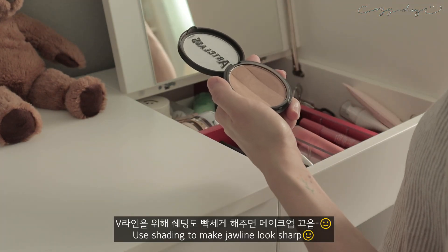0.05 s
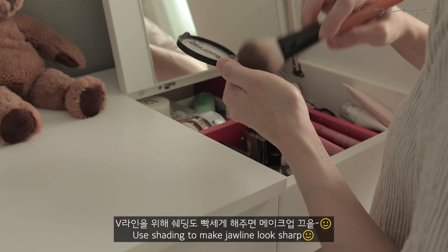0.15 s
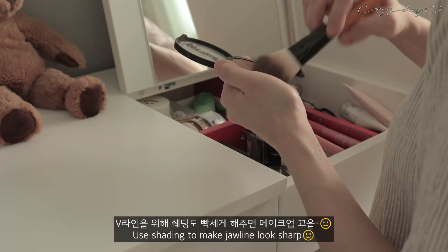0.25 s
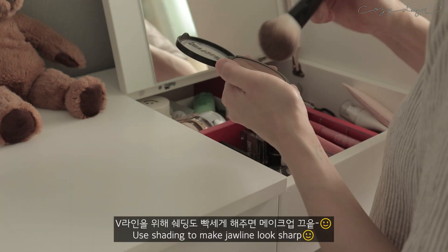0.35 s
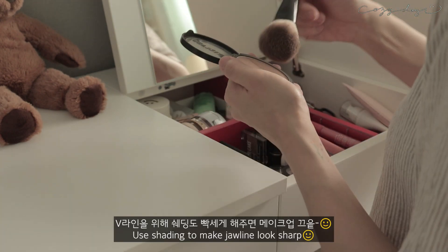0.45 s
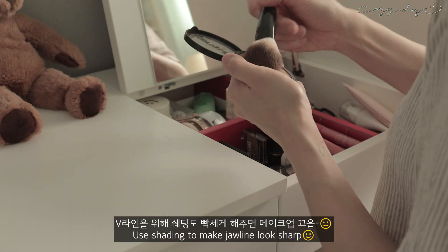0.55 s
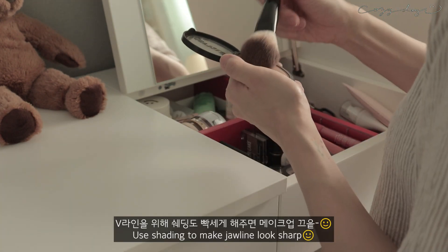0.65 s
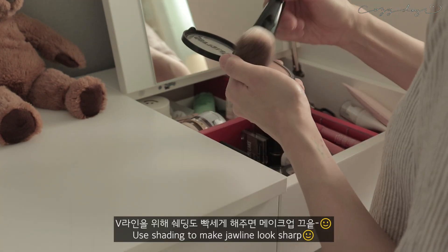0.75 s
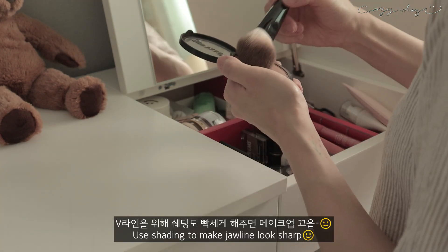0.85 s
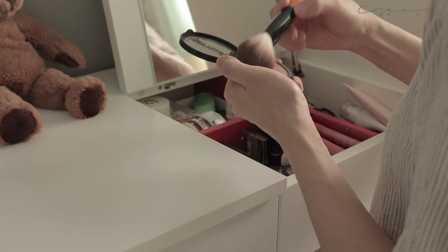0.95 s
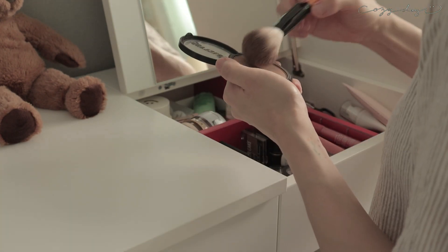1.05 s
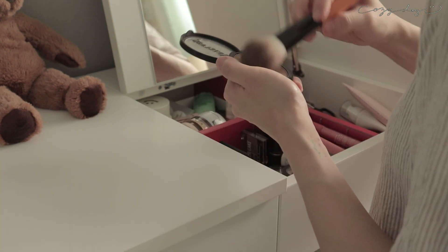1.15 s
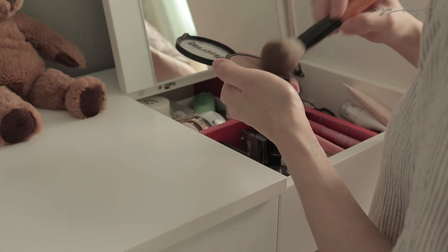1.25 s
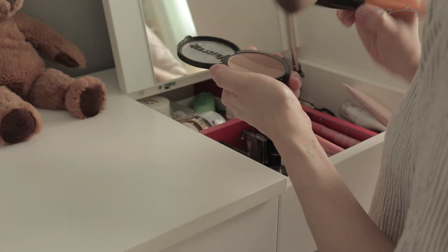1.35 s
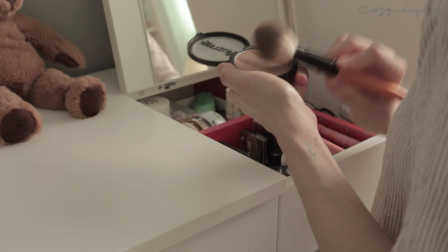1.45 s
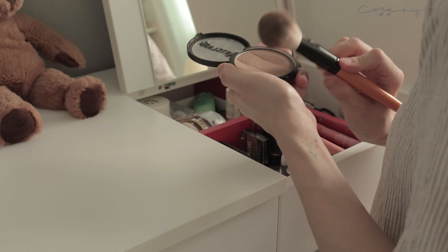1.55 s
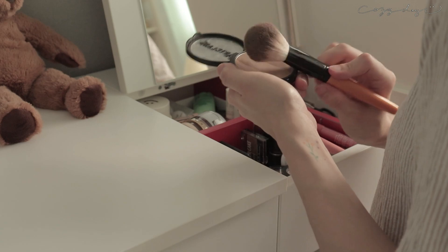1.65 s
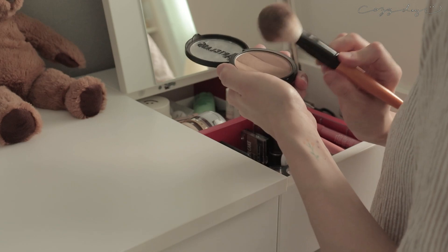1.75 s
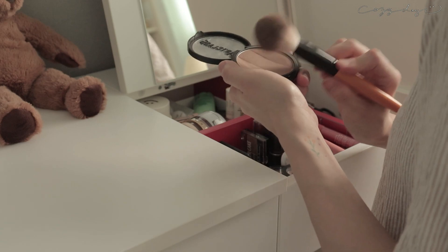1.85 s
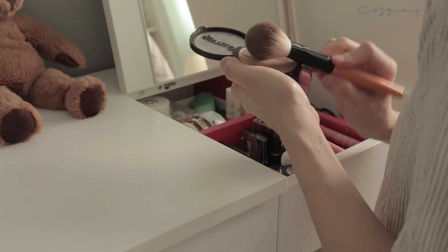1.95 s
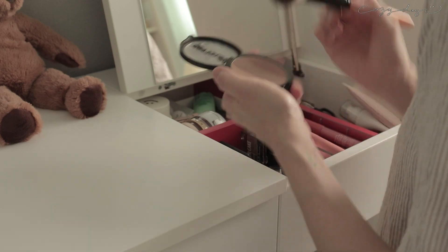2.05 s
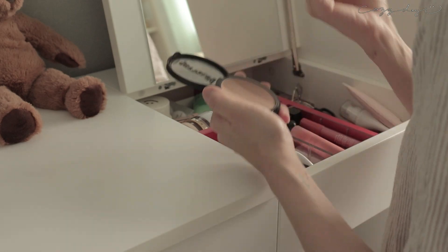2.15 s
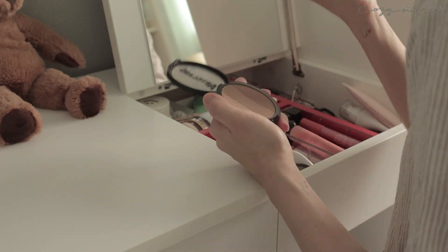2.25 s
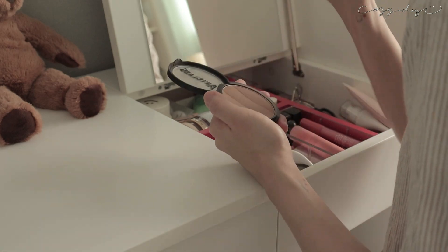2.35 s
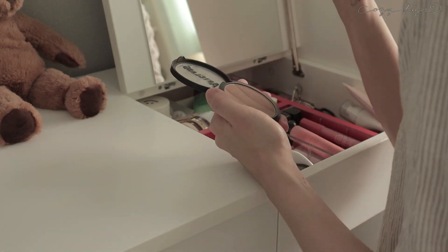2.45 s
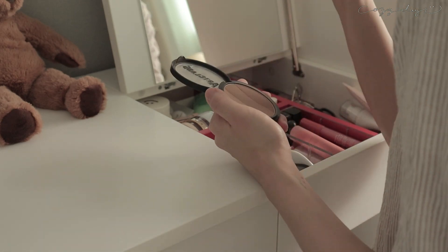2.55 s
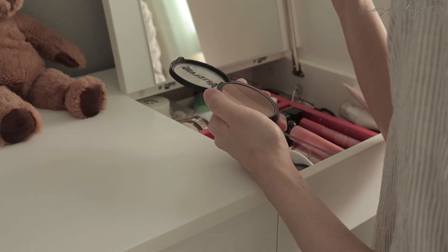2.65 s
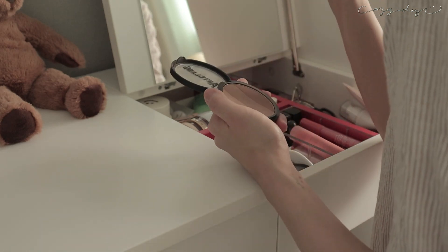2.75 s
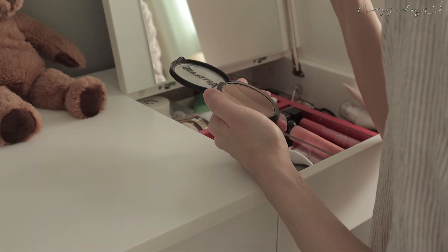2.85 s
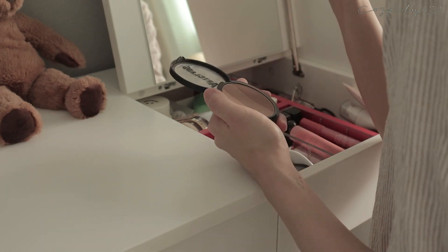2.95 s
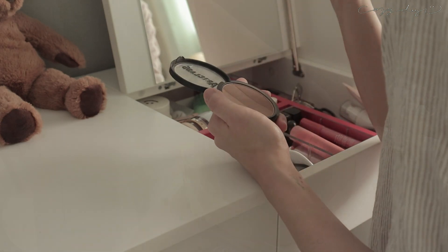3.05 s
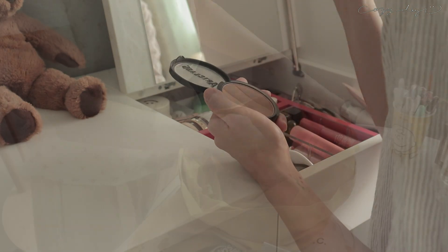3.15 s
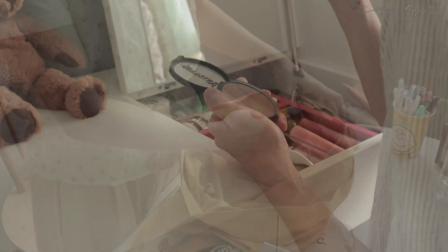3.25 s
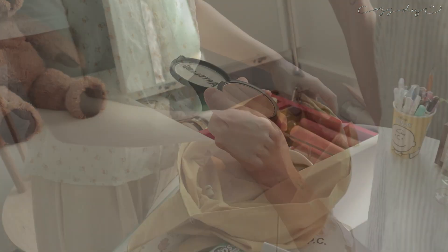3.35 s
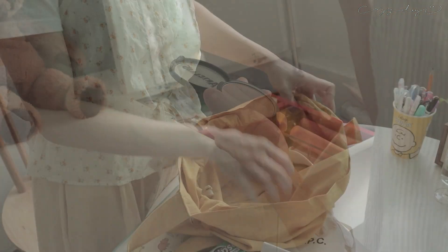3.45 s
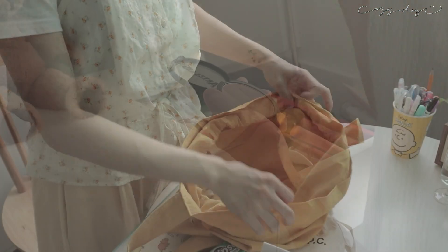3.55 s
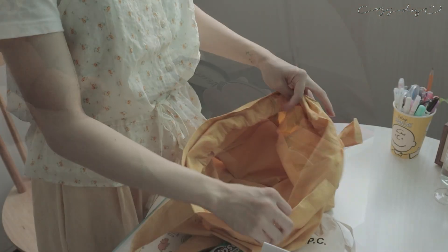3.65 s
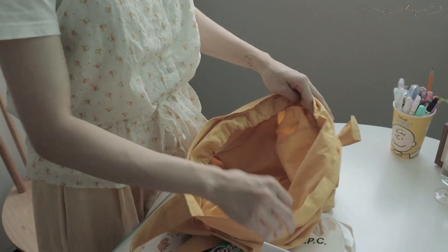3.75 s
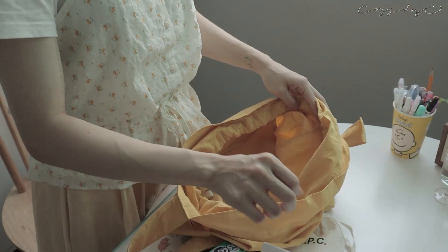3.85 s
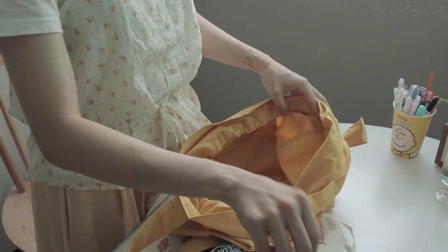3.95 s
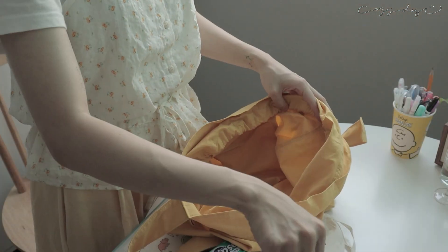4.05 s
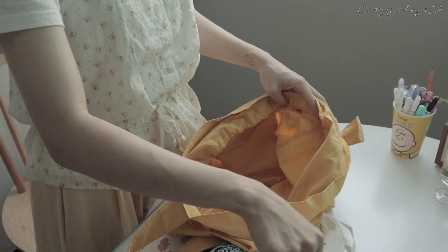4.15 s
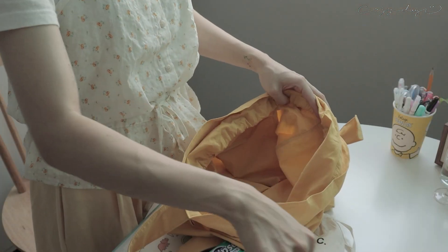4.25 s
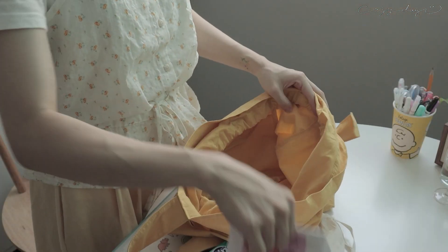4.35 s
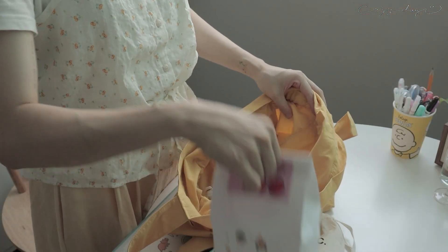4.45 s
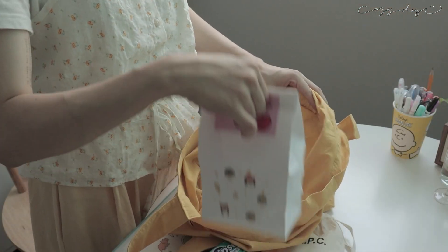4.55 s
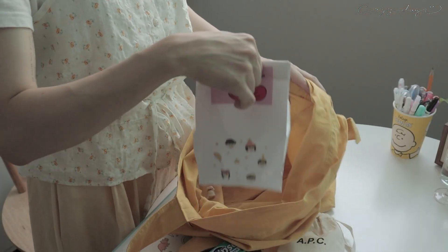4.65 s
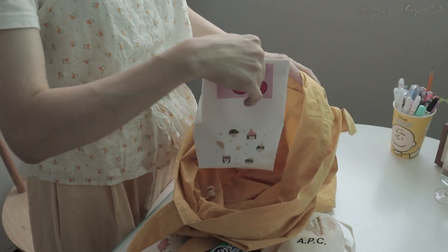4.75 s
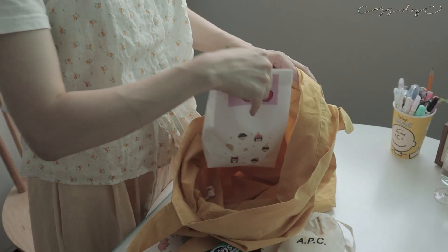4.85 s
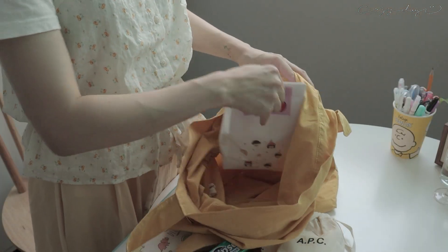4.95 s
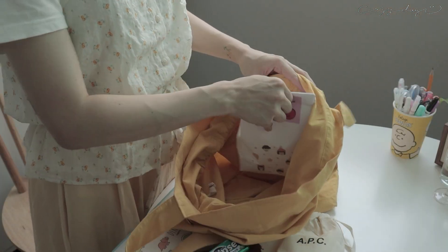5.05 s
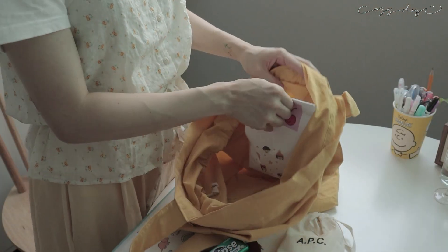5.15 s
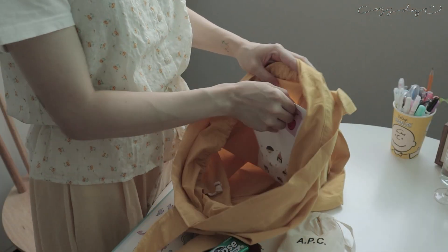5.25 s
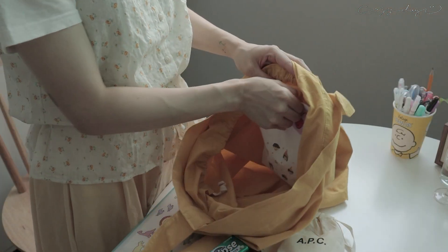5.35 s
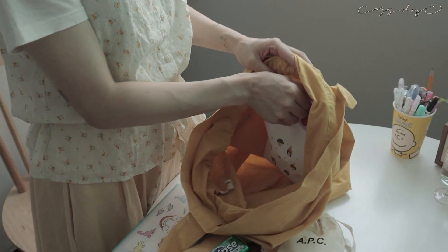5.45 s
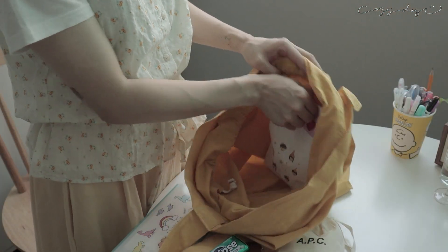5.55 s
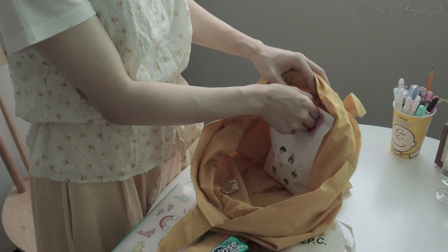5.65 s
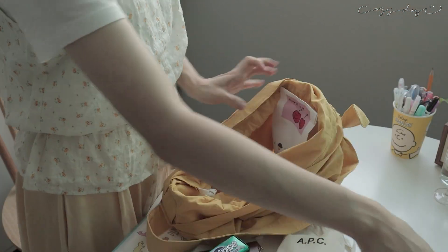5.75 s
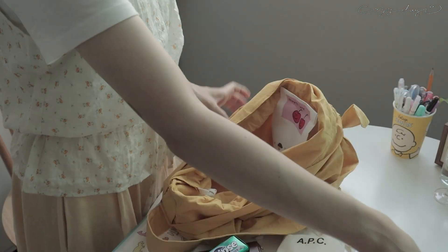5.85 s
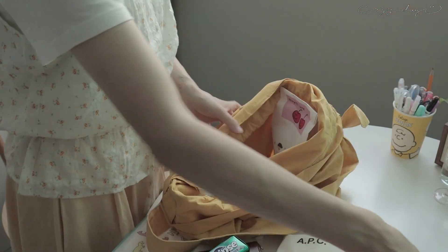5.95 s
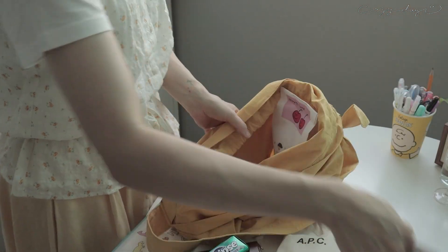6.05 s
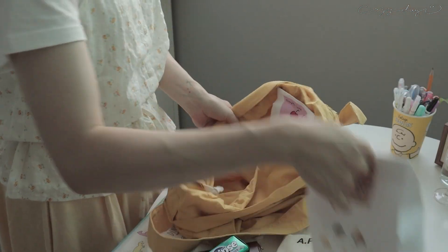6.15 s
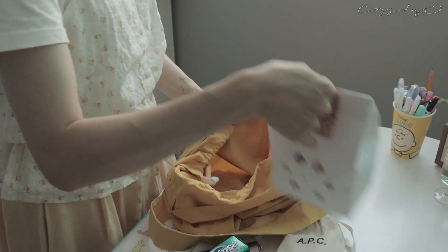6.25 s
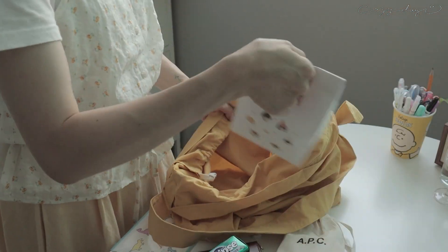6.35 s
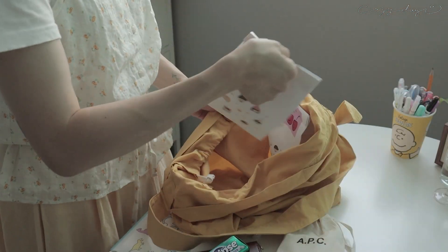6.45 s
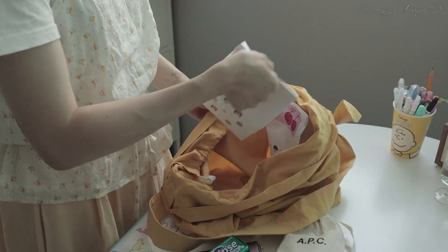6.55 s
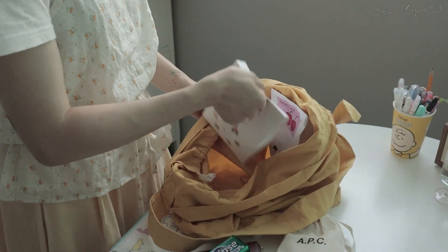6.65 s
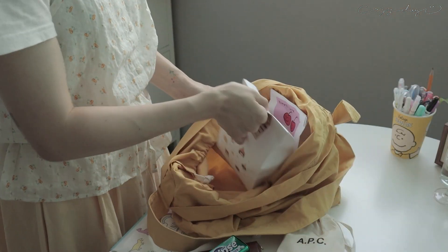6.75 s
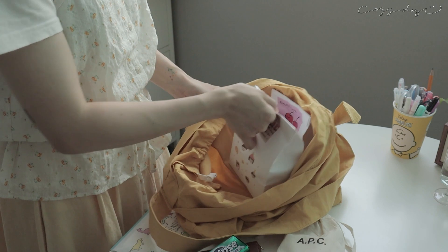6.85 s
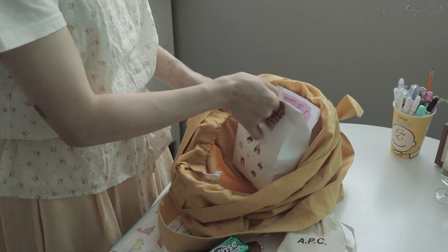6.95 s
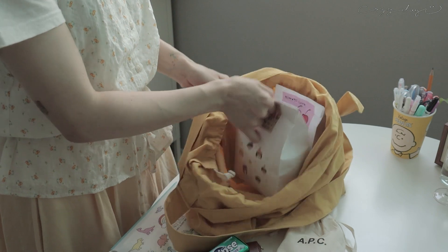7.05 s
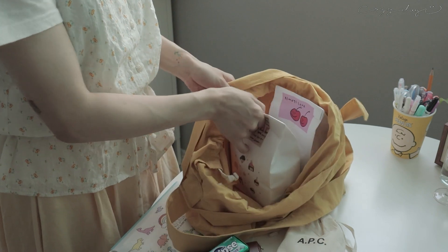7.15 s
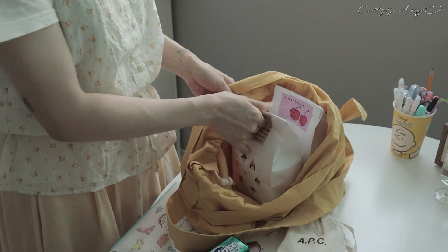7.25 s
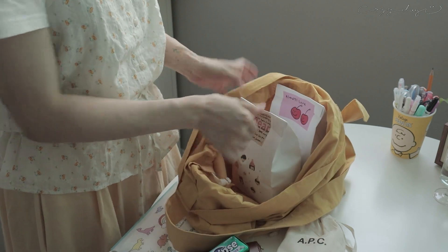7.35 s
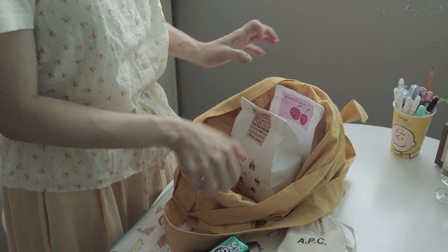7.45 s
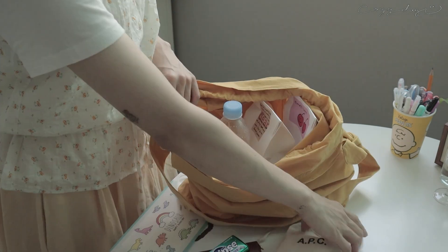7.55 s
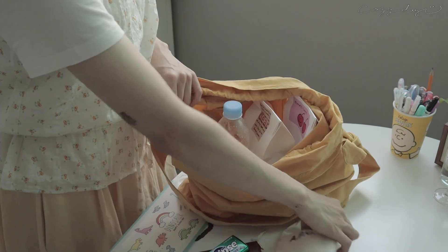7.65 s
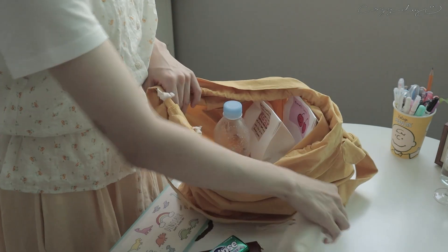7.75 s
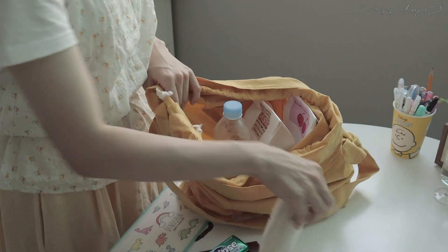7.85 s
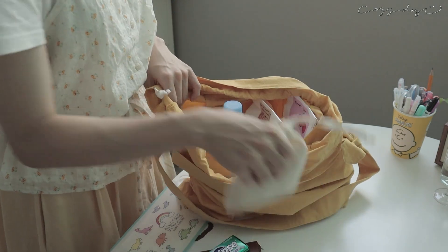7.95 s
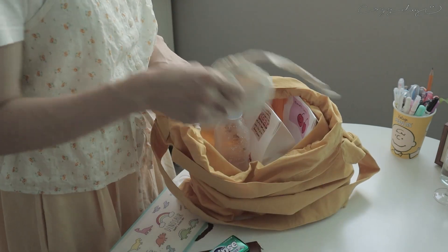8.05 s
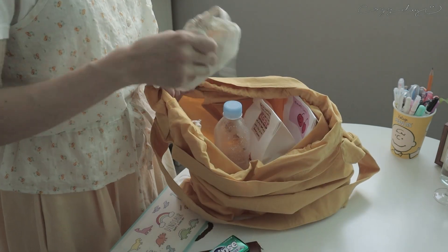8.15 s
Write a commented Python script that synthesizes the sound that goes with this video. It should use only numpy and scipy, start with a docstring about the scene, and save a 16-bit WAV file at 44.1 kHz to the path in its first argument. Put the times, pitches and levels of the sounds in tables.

```python
"""Paper packets slide into a canvas bag on a table: random slips, filtered into scrape, hiss and hollow.
Shaped noise and decaying sines give the knocks in bag and table, a snapping packet and flipping creases.
Before this, in a room with louder air, a make-up brush whispers over powder (swelling noise) and taps four
times on a plastic compact close by (decaying modes, a noise crack and an echo).
Coloured noise is the air of each room, with a low sine drone in the second; the sound is mono."""
import sys
import numpy as np
from scipy import signal
from scipy.fft import rfft, irfft, next_fast_len
from scipy.io import wavfile
from scipy.ndimage import uniform_filter1d, map_coordinates

SR = 44100
rng = np.random.default_rng(int(sys.argv[2]) if len(sys.argv) > 2 else 0)


def transcribe(signal):
    """Save signal, clipped to [-1, 1], as a 16-bit WAV file at the path in sys.argv[1]."""
    frames = np.atleast_2d(signal).T
    limited = np.clip(frames, -1, 1)
    pcm = np.round(limited * 32767).astype(np.int16)
    wavfile.write(sys.argv[1], SR, pcm)


N = 362502

# All levels in the tables are relative; spectra are in relative dB per Hz.
# A packet or hand sliding along the canvas: start_s, attack_s, release_s, scrape_db,
# hiss_over_scrape_db, hollow_over_scrape_db
STROKES = [(3.5, 0.208, 0.106, -49, -2, -0.5), (3.759, 0.0242, 0.0227, -45.5, -1.5, -20),
           (3.81, 0.1, 0.059, -58, 4, -23), (4.04, 0.076, 0.056, -52.5, -2.5, -3.5),
           (4.152, 0.0101, 0.115, -44, -1, 1), (4.19, 0.1666, 0.0806, -39.5, -8.5, -6),
           (4.868, 0.091, 0.184, -40, -5.5, -7), (4.988, 0.0812, 0.033, -30.5, -7.5, -6.5),
           (5.01, 0.2054, 0.1995, -28.5, -6, -6.5), (5.38, 0.1806, 0.0713, -36.5, -4.5, -6),
           (5.612, 0.084, 0.207, -36.5, -5, -.5), (5.85, 0.0873, 0.026, -40.5, 4, -7.5),
           (5.94, 0.0957, 0.0344, -37, -6.5, -2), (6.19, 0.0407, 0.0246, -42, 4, -4.5),
           (6.1, 0.1147, 0.27, -42.5, -9, -.5), (6.706, 0.0487, 0.284, -36.5, 2, -3.5),
           (6.83, 0.096, 0.0356, -32, -3.5, -9), (6.93, 0.0825, 0.217, -36, -10.5, -7.5),
           (7.043, 0.1394, 0.0408, -34, 1.5, -1), (7.27, 0.0876, 0.0544, -37.5, -1.5, 0.5),
           (7.4, 0.1113, 0.0344, -42.5, -12, -7), (7.615, 0.0256, 0.255, -37, -2, -9),
           (7.742, 0.1154, 0.0596, -36.5, -5.5, -9.5), (7.956, 0.081, 0.072, -46, -2, -26.5),
           (8.144, 0.0156, 0.06, -50.5, 4.5, -23.5)]
# Resting friction of the held bag: scrape_db, hiss_db, hollow_db
HELD_DB = [-57.5, -60.5, -58]
# Spectra of the bag's hollow, the canvas scrape and the paper hiss: frequency_hz, level_db
BAG_SPECTRUM = [(60, -26.5), (150, -6.5), (300, -3.5), (470, 1.5), (620, -3.5), (900, -25.5), (2000, -48)]
CANVAS_SPECTRUM = [(300, -46.5), (700, -2.5), (1150, 1), (1900, -3), (2900, -5), (4100, -1), (5200, -15.5),
                   (9000, -28)]
PAPER_SPECTRUM = [(1000, -7.5), (3000, 0), (4100, 3), (5500, -0.5), (7500, -1), (10000, -4.5),
                  (15500, -7.5)]
# A packet's edge dragging over the weave: start_s, attack_s, release_s, level_db
EDGE_DRAG = (6, 0.0075, 0.003, -37)
# Spectrum of the edge's thin rasp: frequency_hz, level_db
EDGE_SPECTRUM = [(2500, -29), (3400, -7), (3850, 0.5), (4300, -8.5), (5500, -29.5)]
# Things bumping in the bag and on the table: start_s, clack_db, thud_db, pitch_hz
KNOCKS = [(4.2135, -17, -23.5, 261.7), (4.354, -25.5, -20.5, 271), (4.427, -33, -31.5, 260.7),
          (4.4568, -21.5, -21.5, 312.5), (4.824, -31.5, -39, 300.6), (5.013, -34, -25, 403),
          (5.265, -19.5, -23, 347), (5.675, -23.5, -16.5, 456.3), (5.683, -19, -16, 234.4),
          (5.775, -21.5, -18, 391.3), (5.923, -44.5, -22, 104.7), (5.998, -22, -34, 565),
          (6.382, -30.5, -24, 713), (6.5158, -17.5, -23, 235.8), (6.789, -17.5, -18, 399.7),
          (6.899, -30, -17, 415), (6.918, -26, -19.5, 434.6), (6.945, -17.5, -13.5, 493),
          (7.096, -31.5, -22, 292.3), (7.227, -21, -17.5, 260.2), (7.402, -41.5, -26, 406),
          (7.442, -28, -21.5, 503), (7.486, -23.5, -29.5, 330), (7.624, -19.5, -14, 236.3),
          (7.637, -40, -19.5, 232.6)]
# Spectrum of a clack: frequency_hz, level_db
CLACK_SPECTRUM = [(200, -1.5), (600, 2.5), (1100, 2.5), (1900, 0.5), (2700, -11), (3700, -7.5), (5000, -29),
                  (14000, -43.5)]
# Modes of a thud: pitch_ratio (multiple of its pitch), level_db
PANEL_MODES = [(.65, -5), (1, 0.5), (1.37, -7), (1.9, -11.5)]
# A stiff packet snapping as it is pushed home: start_s, level_db
SNAPS = [(5.4241, -16), (5.4284, 1.5), (5.4299, -25.5)]
# Modes of the stiff packet: frequency_hz, level_db, t60_s
PACKET_MODES = [(459.3, -10.5, 0.028), (973, -11, 0.0118), (1261, -3.5, 0.0122), (2007, -2, 0.0102),
                (2516, -11, 0.0112), (2904, -2, 0.00378), (3763, -7.5, 0.0091)]
# Creases that flip: start_s, level_db, pitch_hz
CREASES = [(3.6216, -27, 4160), (4.1594, -27, 3900), (4.353, -23.5, 3130), (5.8513, -26, 3750),
           (5.8883, -20.5, 3700), (6.3808, -27, 1910), (6.7281, -30, 3610), (6.9444, -18.5, 4060),
           (7.6234, -21, 3800), (7.7245, -12, 3520), (7.7473, -16.5, 1630), (7.8157, -20, 3670),
           (7.8299, -16.5, 2600), (7.865, -21.5, 2600), (7.9987, -20.5, 2470), (8.1865, -26, 3800)]
# Brush handle on the compact: start_s, level_db, rebound_delay_s, rebound_db
TAPS = [(1.5567, -1, .0024, -3.5), (1.7126, 0.5, .0025, -7), (1.8913, -1, 0.0028, -3),
        (2.0346, -2, 0.00224, -4)]
# Modes of compact and handle: frequency_hz, level_db, t60_s
COMPACT_MODES = [(568.5, -19.5, 0.0276), (1036, -15, 0.0256), (1500, -10, 0.0254), (2045.7, -5.5, 0.036),
                 (2131, -19, 0.227), (2340, -29, 0.26), (2401, -5, 0.0247), (2758, -4, 0.0187),
                 (3208, -22, 0.03), (3606, -13.5, 0.0115), (4114, -6, 0.0211), (4200, -38, 0.14),
                 (4590, -36, .17), (5400, -34.5, 0.24), (7500, -22, .01)]
# Spectrum of a hard contact: frequency_hz, level_db
CRACK_SPECTRUM = [(100, -35), (500, -27.5), (2500, 12.5), (5000, -1.5), (8000, 4), (13000, -5.5),
                  (16000, -6.5)]
# Spectrum that the walls return after a tap: frequency_hz, level_db
TAP_ECHO_SPECTRUM = [(300, -23), (1300, -21), (1600, -9), (1750, -18.5), (1930, -4.5), (2130, 1.5),
                     (2500, -3), (3000, -10.5), (3250, -14.5), (4100, -8.5), (5000, -18.5), (5600, -15),
                     (6400, -19), (8200, -19.5), (12500, -24), (16000, -30.5)]
# Bristles on the powder: centre_s, level_db, half_length_s
SWEEPS = [(0.221, -56, .008), (0.306, -61, .03), (1.298, -61.5, .03)]
# Reverberation time: frequency_hz, t60_s
ROOM_DECAY = [(200, 0.386), (1300, 0.341), (2300, 0.358), (4500, 0.347), (9000, 0.277), (15000, 0.22)]
# Air of the first and of the second room: frequency_hz, level_db
FIRST_AIR = [(15, -59.5), (25, -44), (52, -9.5), (108, -1), (166, -8.5), (405, -8), (624, -15.5),
             (775, -12.5), (988, -16), (1160, -14), (3340, -29), (3820, -27), (5880, -39), (14800, -41),
             (16000, -46)]
SECOND_AIR = [(25, -33), (65, 3), (110, -4.5), (200, -1.5), (450, -16.5), (900, -11.5), (2500, -16.5),
              (4000, -17), (6000, -23), (15500, -26.5)]
# Swells of the drone: start_s, length_s, level_db
SWELLS = [(3.751, 0.222, -50.5), (4.98, .4, -55), (5.921, 0.435, -44)]
# Interval in which all packing sounds drop away: start_s, end_s
HUSH = (5.79, 5.848)

MOVE_S = 3.45  # the second room begins
RELEASE_SHAPE = 1.29  # exponent; above 1 a stroke holds its speed a little before it dies away
CRINKLE_PER_S, CRINKLE_DB = 70, -13.5  # small folds popping in the paper; level relative to the hiss
RING_CYCLES = 18.37  # cycles of its pitch in which a thud falls by 60 dB, so low ones last longer
TABLE_LOW_HZ = 123.5  # the table top gives off little bass below this
DRONE_HZ, DRONE_DB = 66.2, -70.5  # steady part of the drone
SWELL_EDGE_S, SWELL_T60_S = 0.046, 1.66
TOP_HZ = 16000  # band limit


def amp(db):
    """Level: decibels to amplitude gain."""
    return 10 ** (np.asarray(db) / 20)


def unit(x):
    """Normalisation: scaled to rms 1."""
    return x / np.sqrt(np.mean(x ** 2) + 1e-20)


def along(points, hz):
    """Interpolation of (Hz, value) points on a logarithmic frequency axis."""
    point_hz, value = np.transpose(points)
    return np.interp(np.log(hz + 1), np.log(point_hz + 1), value)


def clock(size):
    """Sampling: the time of each sample in seconds."""
    return np.arange(size) / SR


def filtered(x, response):
    """Linear filtering: the spectrum times a gain that depends on frequency."""
    padded = next_fast_len(len(x) + 8192)
    spectrum = rfft(x, padded) * response(np.fft.rfftfreq(padded, 1 / SR))
    return irfft(spectrum, padded)[:len(x)]


def coloured(x, spectrum):
    """Spectral shaping by (Hz, dB) points, at rms 1."""
    return unit(filtered(x, lambda hz: amp(along(spectrum, hz))))


def noise(spectrum, size=N):
    """Coloured noise: shaped white noise of rms 1."""
    return coloured(rng.standard_normal(size), spectrum)


def wobble(rate):
    """Slow random modulation: rate knots a second, joined by straight lines."""
    knots = rng.standard_normal(int(N * rate / SR) + 4)
    return map_coordinates(knots, [clock(N) * rate], order=1)


def fade(t, t60):
    """Exponential decay: a fall of 60 dB in t60 seconds."""
    return np.exp(-np.log(1000) * t / t60)


def gate(start, end, edge):
    """Windowing: fully open from start to end, with linear edges outside."""
    t = clock(N)
    return np.clip(np.minimum(t - start, end - t) / edge + 1, 0, 1)


def add(track, s, sound):
    """Superposition: mix a sound in at time s, in place."""
    part = track[round(s * SR):][:len(sound)]
    part += sound[:len(part)]


def stroke_speed(start, attack, release):
    """Motion under friction: the hand speeds up smoothly to 1, then friction slows it."""
    t = clock(N) - start
    rise = np.sin(np.pi / 2 * np.clip(t / attack, 0, 1)) ** 2
    return rise * np.exp(-(np.maximum(t - attack, 0) / release) ** RELEASE_SHAPE)


def friction(spectrum, rate, spread_db, flutter_db):
    """Dry friction: random slips, rate a second on average, filtered and fluttering in level."""
    chance, size, sign = rng.random(N), rng.standard_normal(N), rng.standard_normal(N)
    slips = (chance < rate / SR) * amp(spread_db * np.clip(size, -3, 3)) * sign
    flutter = amp(flutter_db * (wobble(28) + wobble(110)))
    return unit(coloured(slips, spectrum) * flutter)


def folds(x, depth_db):
    """Shifting resonance: moving cloth changes shape, so its resonances come and go."""
    z = signal.stft(x, nperseg=512)[2]
    field = uniform_filter1d(rng.standard_normal(z.shape), size=3, axis=0)  # smooth over frequency
    field = uniform_filter1d(field, size=9, axis=1)  # and over time
    return unit(signal.istft(z * amp(depth_db * unit(field)), nperseg=512)[1][:N])


def rustle():
    """Sliding friction: stroke speed drives scrape, hiss and hollow; overlapping strokes add in power."""
    power = np.zeros((3, N)) + amp(HELD_DB)[:, None] ** 2  # the held bag never quite rests
    for start, attack, release, db, hiss_db, hollow_db in STROKES:
        gains = amp(db + np.array([[0], [hiss_db], [hollow_db]]))
        power += (gains * stroke_speed(start, attack, release)) ** 2
    scrape_level, hiss_level, hollow_level = np.sqrt(power)

    hollow = folds(friction(BAG_SPECTRUM, rate=2500, spread_db=3, flutter_db=1.2), depth_db=3.5)

    scrape = friction(CANVAS_SPECTRUM, rate=6000, spread_db=0.5, flutter_db=0.76)
    crackle = friction(CANVAS_SPECTRUM, rate=110, spread_db=2, flutter_db=.8)
    cloth = folds(scrape + amp(-10) * crackle, depth_db=2.5)

    hiss = friction(PAPER_SPECTRUM, rate=14000, spread_db=0.0, flutter_db=1.2)
    crinkle = friction(PAPER_SPECTRUM, rate=CRINKLE_PER_S, spread_db=0.5, flutter_db=-0.7)
    paper = unit(hiss + amp(CRINKLE_DB) * crinkle)

    strokes = amp(1.5) * hollow_level * hollow
    strokes += amp(0.02) * scrape_level * cloth
    strokes += amp(0.94) * hiss_level * paper
    return strokes * (1 - gate(0, MOVE_S, edge=0.011))


def edge_drag():
    """Resonant friction: one stroke of slips into the narrow ring of a stiff paper edge."""
    start, attack, release, db = EDGE_DRAG
    rasp = friction(EDGE_SPECTRUM, rate=1500, spread_db=1, flutter_db=1.5)
    return amp(db) * stroke_speed(start, attack, release) * rasp


def knocks():
    """Padded impact: a short clack at the contact, with a softened thud from bag and table."""
    out, t = np.zeros(N), clock(SR // 4)
    for s, clack_db, thud_db, hz in KNOCKS:
        clack = noise(CLACK_SPECTRUM, size=len(t)) * (fade(t, 0.0162) + amp(-10) * fade(t, 0.153))
        thud = sum(amp(db) * np.sin(2 * np.pi * (hz * ratio * t + rng.random()))
                   for ratio, db in PANEL_MODES)
        swell = 1 - np.exp(-(hz * t / 0.573) ** 2)  # the cloth pads the blow over part of a cycle
        thud = thud * swell * fade(t, RING_CYCLES / hz)
        add(out, s, amp(clack_db - 5.5) * clack + amp(thud_db - 3.5) * thud)
    return signal.sosfilt(signal.butter(2, TABLE_LOW_HZ, "high", fs=SR, output="sos"), out)


def strike(modes, crack_db, crack_t60, scatter_db):
    """Modal excitation: a hard contact cracks and rings modes at strengths drawn anew."""
    t = clock(SR // 6)
    ring = np.zeros(len(t))
    for k, (hz, db, t60) in enumerate(modes):
        strength = (-1) ** k * amp(db + scatter_db * rng.standard_normal())  # alternating polarity
        ring += strength * fade(t, t60) * np.sin(2 * np.pi * hz * t)
    return ring + amp(crack_db) * fade(t, crack_t60) * noise(CRACK_SPECTRUM, size=len(t))


def packet_snap():
    """Buckling: a stiff wall catches, then gives way, each time striking the packet's modes."""
    out = np.zeros(N)
    for s, db in SNAPS:
        snap = strike(PACKET_MODES, crack_db=-15.5, crack_t60=0.0092, scatter_db=2.5)
        add(out, s, amp(db - 1.5) * snap)
    return out


def creases():
    """Snap-through: each fold that flips is a dry noise tick around its own pitch."""
    out, t = np.zeros(N), clock(SR // 16)
    for s, db, hz in CREASES:
        tick = noise([(hz / 6, -14), (hz, 0), (hz * 4, -16)], size=len(t))
        add(out, s, amp(db - 7) * tick * (fade(t, 0.00566) + amp(-7) * fade(t, 0.0637)))
    return out


def brush_taps():
    """Impact and reflection: the handle hits the rim, the loose lid rebounds, and the walls answer."""
    out, walls = np.zeros(N), room_tail(build=0.01)
    for s, db, rebound_delay, rebound_db in TAPS:
        tap = strike(COMPACT_MODES, crack_db=-3.0, crack_t60=0.0233, scatter_db=0.03)
        t = clock(len(tap))
        rebound = fade(t, 0.00356) * noise(CRACK_SPECTRUM, size=len(t))
        add(tap, rebound_delay, amp(rebound_db) * rebound)
        add(out, s, amp(db - 1.5) * tap)
        # the hand barely moves, so the echo changes only in part from tap to tap
        echo = coloured(walls + 0.78 * room_tail(build=0.0035), TAP_ECHO_SPECTRUM)
        add(out, s, amp(db - 33.5) * echo)
    return out


def bristles():
    """Light friction: the brush whispers over the powder as noise that swells and fades."""
    touch = sum(amp(db) * np.exp(-((clock(N) - s) / half_length) ** 2) for s, db, half_length in SWEEPS)
    return touch * noise(PAPER_SPECTRUM)


def room_tail(build):
    """Reverberation: the answer to a click builds up, then each frequency decays at its own rate."""
    hz, t, z = signal.stft(rng.standard_normal(SR // 2), SR, nperseg=256)
    tail = signal.istft(z * fade(t, along(ROOM_DECAY, hz)[:, None]), SR, nperseg=256)[1]
    tail = tail * (1 - np.exp(-(clock(len(tail)) / build) ** 2))
    return tail / np.linalg.norm(tail)


def room_tone():
    """Stationary noise: steady air in each room, with a swelling low drone in the second."""
    first, t = gate(0, MOVE_S, edge=0.0102), clock(N)
    level = amp(DRONE_DB)
    for s, length, db in SWELLS:
        decay = fade(np.maximum(t - s, 0), SWELL_T60_S)
        level = level + amp(db) * gate(s, s + length, SWELL_EDGE_S) * decay
    phase = 2 * np.pi * DRONE_HZ * t + 0.22 * wobble(9)  # wanders slightly, in radians
    drone = level * np.sqrt(2) * np.sin(phase)
    first_air = amp(-43.5) * noise(FIRST_AIR)
    second_air = amp(-52.0) * noise(SECOND_AIR)
    return first * first_air + (1 - first) * (second_air + drone)


def scene():
    """Superposition: both rooms in turn, the same signal in two channels."""
    bumps = knocks() + packet_snap() + creases()
    walls = amp(-9.5) * signal.fftconvolve(bumps, room_tail(build=0.00234))[:N]
    packing = (rustle() + edge_drag() + bumps + walls) * (1 - gate(*HUSH, edge=0.0037))
    mono = packing + brush_taps() + bristles() + room_tone()
    return np.array([mono, mono])


def record(dry):
    """Overload and band limit: peaks clip at 0.95, then a 400 Hz wide slope ends the band at TOP_HZ."""
    clipped = np.clip(dry, -.95, .95)

    def band(hz):
        """Low-pass response: gain falls linearly from 1 to 0 around the limit."""
        return np.clip((TOP_HZ - hz) / 400 + .5, 0, 1)

    return np.array([filtered(channel, band) for channel in clipped])


dry = scene()
out = record(dry)
transcribe(out)
```